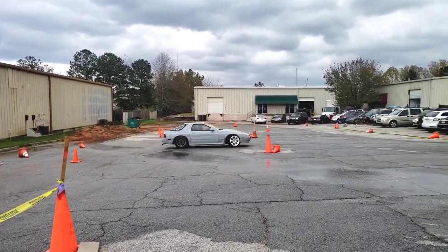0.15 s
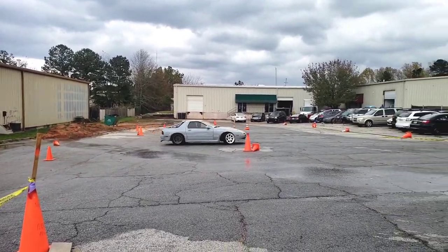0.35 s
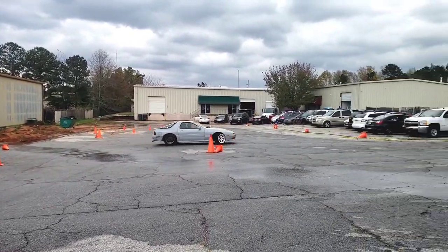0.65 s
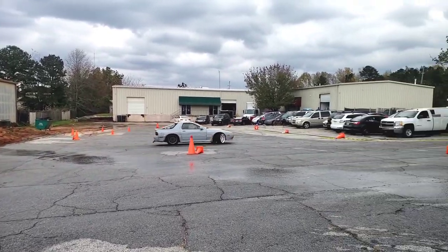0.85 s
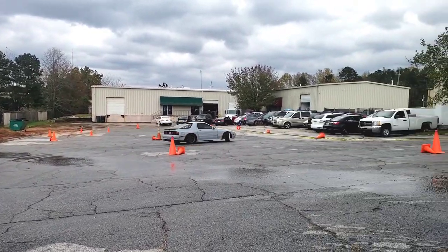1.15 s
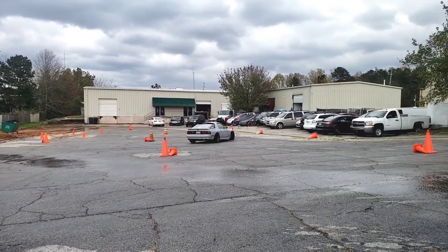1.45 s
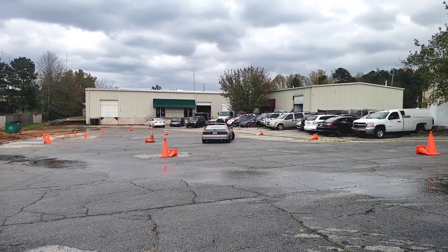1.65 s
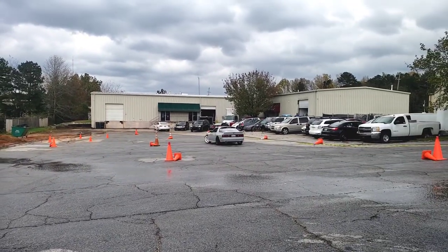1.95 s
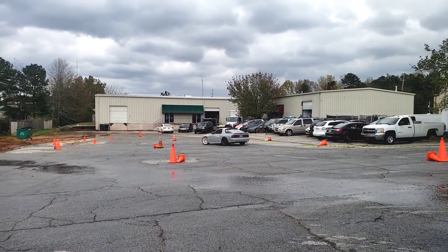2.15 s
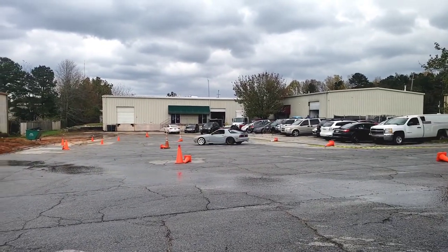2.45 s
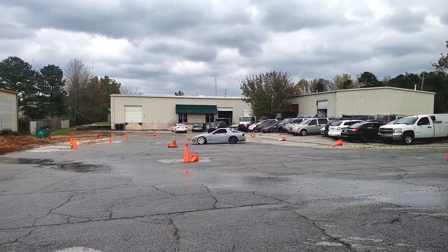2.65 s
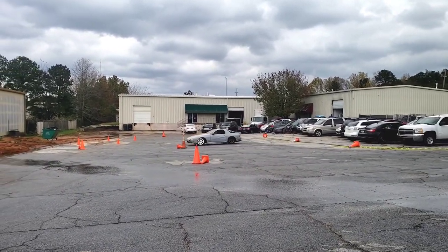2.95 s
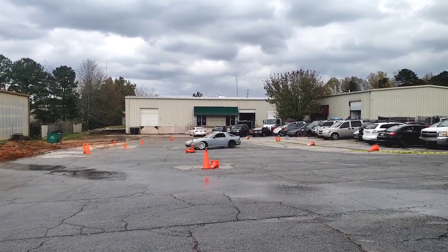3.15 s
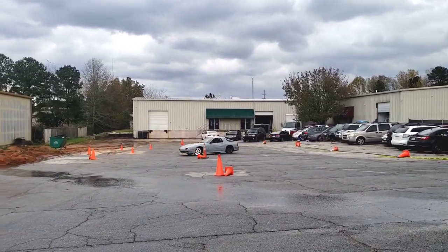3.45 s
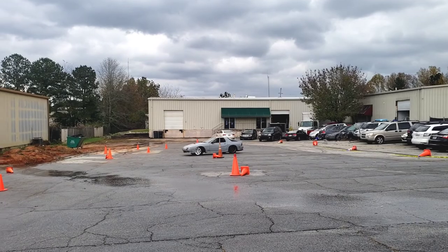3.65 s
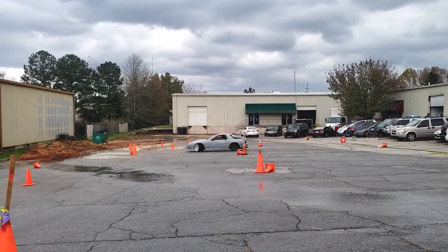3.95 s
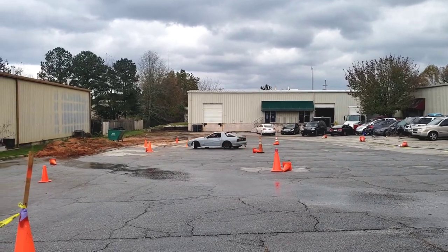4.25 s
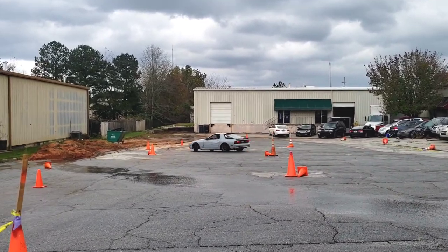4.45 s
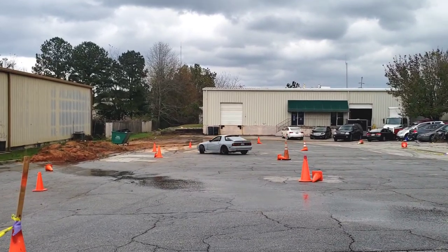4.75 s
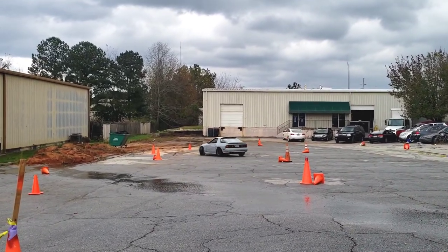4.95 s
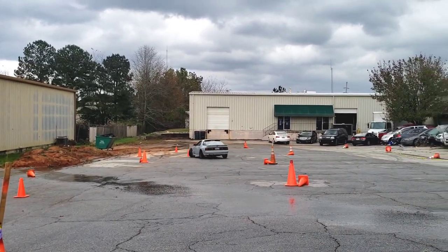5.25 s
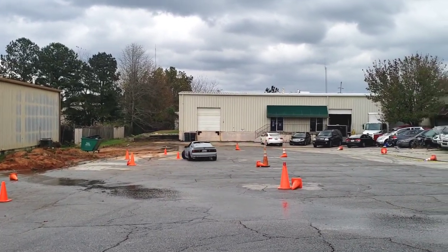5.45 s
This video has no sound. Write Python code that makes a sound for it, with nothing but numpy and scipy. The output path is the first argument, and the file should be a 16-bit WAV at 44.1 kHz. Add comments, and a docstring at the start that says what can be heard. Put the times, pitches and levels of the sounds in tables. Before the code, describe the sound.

A rotary sports car slides around cones on wet asphalt. Its exhaust barks and buzzes through a string of throttle stabs, each climbing in pitch then lifting off, with rasping hiss on the hardest pulls. Soft tyre scrub shows between stabs. Later revs are lower and dull, ending in a deep burbling rise. Open lot, a dull slap of echo from a warehouse, stereo handheld microphone at some distance.

```python
"""Wet parking lot: a rotary-engined car drifts round cones, the throttle stabbed and lifted again and again.
Each firing is a click that drives filters: boom in the muffler, bark in the tailpipe, rasping hiss under load.
Off throttle the clicks grow uneven in strength and timing, so the engine stumbles and burbles.
Filtered noise makes the tyre scrub and open air; a delayed, dulled copy is the warehouse echo."""
import sys
import numpy as np
from scipy import signal
from scipy.fft import rfft, irfft, next_fast_len
from scipy.io import wavfile
from scipy.ndimage import uniform_filter1d

SR = 44100
rng = np.random.default_rng(int(sys.argv[2]) if len(sys.argv) > 2 else 0)


def int16_out(signal):
    """Quantize to a 16-bit WAV file."""
    q = np.round(np.clip(np.atleast_2d(signal).T, -1, 1) * 32767)
    wavfile.write(sys.argv[1], SR, q.astype(np.int16))


N = 246959
TIME_S = np.arange(N) / SR
PADDED = next_fast_len(N + SR // 2)
BINS_HZ = np.maximum(np.arange(PADDED // 2 + 1) * SR / PADDED, 1)


def from_db(db):
    """Decibels to amplitude gain."""
    return 10 ** (np.asarray(db) / 20)


def rms_one(x):
    """Scale to unit rms."""
    return x / np.sqrt(np.mean(x ** 2) + 1e-20)


def in_time(rows):
    """Interpolate each column of a time table to one value a sample."""
    s, *columns = np.transpose(rows)
    return [np.interp(TIME_S, s, column) for column in columns]


def over_hz(points):
    """Interpolate a frequency table, on a log axis, to every bin."""
    hz, value = np.transpose(points)
    return np.interp(np.log(BINS_HZ), np.log(hz), value)


def filtered(x, response):
    """Apply a frequency response."""
    return irfft(rfft(x, PADDED) * response, PADDED)[..., :N]


def body(x, colour):
    """Minimum-phase filter: it rings only after it is struck."""
    cepstrum = irfft(np.log(from_db(over_hz(colour))), PADDED)
    # fold the cepstrum onto positive time
    cepstrum[1:PADDED // 2] *= 2
    cepstrum[PADDED // 2 + 1:] = 0
    return filtered(x, np.exp(rfft(cepstrum)))


def resonate(x, modes):
    """Parallel resonances, each with a centre, a width and a level."""
    response = sum(
        from_db(db) / (1 + 1j * (BINS_HZ - hz ** 2 / BINS_HZ) / width_hz)
        for hz, width_hz, db in modes)
    return filtered(x, response)


def ahead(x, lead_s):
    """Advance in time: the slow swell of a pulse starts before its sharp front."""
    return filtered(x, np.exp(2j * np.pi * BINS_HZ * lead_s))


def evened(x, size=2200):
    """Unit level over a few firings; single pulses keep their differences."""
    power = np.mean(np.atleast_2d(x) ** 2, axis=0)
    power = uniform_filter1d(uniform_filter1d(power, size), size)
    return x / np.sqrt(np.abs(power) + 1e-12)


def drift(knots_per_s):
    """Slow random curve of unit rms, linear between random knots."""
    knots = rng.standard_normal(4000)
    return rms_one(np.interp(TIME_S * knots_per_s, np.arange(len(knots)), knots))


def swell(at_s, half_width_s):
    """Gaussian bump of height 1."""
    return np.exp(-((TIME_S - at_s) / half_width_s) ** 2)


# likeness of left and right noise: f/Hz, likeness/0-1
STEREO_LIKENESS = [(60, 0.61), (400, 0.99), (1000, 0.73), (3000, 1), (14000, 0.13)]


def diffuse_noise():
    """Stereo noise whose left-right likeness varies with frequency."""
    mid, side = rng.standard_normal((2, N))
    alike = np.clip(over_hz(STEREO_LIKENESS), 0, 1)
    return filtered(mid, np.sqrt(1 + alike)) + filtered(side, np.sqrt(1 - alike)) * [[1], [-1]]


# open-air spectrum: f/Hz, relative level/dB
AIR_COLOUR = [(20, -4), (45, -15), (100, 5), (230, 7.5), (470, -17), (850, -12.5), (2000, -17), (3800, -26),
              (6100, -41), (7400, -27.5), (12400, -46), (15800, -40)]


def open_air(level_db):
    """Steady broadband noise of the open air, strongest in the bass."""
    return from_db(level_db) * rms_one(body(diffuse_noise(), AIR_COLOUR))


# warehouse echo, strong while the tailpipe points at it: t/s, delay/s, level before dulling/dB
WALL_ECHO = [(0, .27, -21), (.7, .26, -18.5), (1.15, 0.25, -9.5), (1.5, .25, -14), (2.8, .27, -27),
             (3.5, .23, -12), (4.1, 0.22, -16), (5.6, 0.22, -16)]


def parking_lot(x, scatter_db, t60_s, onset_s):
    """One dull echo from the warehouse, and a faint scatter from parked cars and trees."""
    delay_s, wall_db = in_time(WALL_ECHO)
    dull = body(x, [(100, 6.5), (800, 4), (1500, -2), (4000, -4), (12000, -29)])  # f/Hz, gain/dB
    delayed = np.array([np.interp(TIME_S - delay_s, TIME_S, side, left=0) for side in dull])
    echo = from_db(wall_db) * delayed
    decay = from_db(-60 * TIME_S / t60_s)
    onset = 1 - np.exp(-(TIME_S / onset_s) ** 2)
    tail = diffuse_noise() * decay * onset
    scatter = filtered(dull.mean(axis=0), rfft(rms_one(tail) / np.sqrt(N), PADDED))
    return echo + from_db(scatter_db) * scatter


# scrub spectrum: f/Hz, relative level/dB
SCRUB_COLOUR = [(260, -39.5), (450, -22), (585, -9), (634, -14.5), (715, -18), (824, -9), (1050, -9.5),
                (1490, -13), (2300, -13), (2570, -21.5), (5000, -35), (6500, -79), (11000, -120)]
# tread resonances: f/Hz, width/Hz, relative level/dB
TREAD_RESONANCES = [(829, 46.6, 0), (1480, 120, -7.5)]
# sliding off throttle: t/s, scrub level/dB
SLIDE_LEVEL = [(0, -35.5), (1.5, -42), (2.8, -43), (3.1, -41.5), (3.4, -45), (4.2, -43.5), (4.7, -53),
               (5.6, -56)]
SCRUB_DUCK_DB = 3  # at full throttle
SQUEAL_S, SQUEAL_HALF_WIDTH_S, SQUEAL_DB = 3.08, .11, -41


def tyres(throttle):
    """Rubber scrubs over wet asphalt, less under load; once the tread resonances almost sing."""
    scrub = rms_one(body(diffuse_noise(), SCRUB_COLOUR)) * from_db(1.1 * drift(40))
    scrub_db = in_time(SLIDE_LEVEL)[0] - SCRUB_DUCK_DB * throttle
    tread = rms_one(resonate(diffuse_noise(), TREAD_RESONANCES))
    squeal = from_db(SQUEAL_DB) * swell(SQUEAL_S, SQUEAL_HALF_WIDTH_S) * tread
    return from_db(scrub_db) * scrub + squeal


def pressed(start_s, held_s, attack_s, release_s):
    """One stab, 0-1: linear rise, hold, exponential release."""
    rise = np.clip((TIME_S - start_s) / attack_s, 0, 1)
    return rise * np.exp(-np.maximum(TIME_S - start_s - held_s, 0) / release_s)


# throttle stabs: start t/s, held/s, attack/s, start rate/firings per s, end rate/firings per s,
# bow of the climb/firings per s, coasting time/s, hardest pull t/s, pull half-width/s,
# levels before layer trims: low boom/dB, upper boom/dB, bark/dB, pulse front/dB, hiss/dB,
# rasp/0-1, stumbling/0-1
THROTTLE_STABS = [ (-0.02, 0.09, .018, 161, 167, 0, .5, 0, .04, -24, -31, -32, -31, -35.5, .5, .35),
                  (0.172, 0.288, .012, 142, 151.8, 8.1, .8, .283, .125, -15, -23.5, -24, -28, -39.5, .45, .015),
                  (0.62, 0.55, .05, 123.2, 162.8, -1, .2, 1.055, .135, -17, -20.6, -22.5, -23.5, -36.7, .1, .02),
                  (1.64, 0.46, .035, 93.4, 141.2, 4.6, .5, 1.74, .38, -11.5, -18, -20.7, -31.5, -39.3, .8, .02),
                  (2.281, 0.279, .006, 108.8, 144.7, 4.1, 1.5, 2.42, .45, -13.3, -20, -21.7, -26.5, -31.7, .95, .025),
                  (3.247, 0.633, .013, 64.8, 108.8, 5.2, .27, 3.81, .135, -16, -17.5, -23.7, -31.2, -48.5, .5, .035),
                  (4.78, 0.22, .09, 52, 69, 2, .3, 4.96, .07, -27, -22.8, -43.5, -49.5, -60, .1, 0),
                  (5.2, 0.42, .11, 66, 99.5, 6.5, .3, 5.5, .24, -16.3, -19.2, -34, -50, -54.9, .1, .1), ]
FLYWHEEL_S = .03  # rounds each change of speed


def engine_speed():
    """Firings per s: a bowed climb in each stab, then coasting to where the next one starts."""
    rate = np.zeros(N)
    for stab, following in zip(THROTTLE_STABS, THROTTLE_STABS[1:] + [None]):
        start_s, held_s, _, low, high, bow, coast_s, *_ = stab
        u = np.clip((TIME_S - start_s) / held_s, 0, 1)
        speed = low + (high - low) * u + 4 * bow * u * (1 - u)
        if following:
            end_s = start_s + held_s
            next_start_s, next_low = following[0], following[3]
            fall = np.expm1(-np.maximum(TIME_S - end_s, 0) / coast_s)
            full_fall = np.expm1(-(next_start_s - end_s) / coast_s)
            speed = speed + (next_low - high) * fall / full_fall
        rate = np.where(TIME_S >= start_s, speed, rate)
    return uniform_filter1d(rate, max(int(FLYWHEEL_S * SR), 1))


STEADY_FIRINGS_PER_S, STUMBLE_PER_OCTAVE = 98, .58  # stumbling grows below this speed
STUMBLE_COASTING = .04  # least stumbling at closed throttle, 0-1


def engine_state(rate, release_s):
    """Throttle, rasp share of the hiss, and stumbling, which grows at low speed; all 0-1."""
    gates = np.array([pressed(start_s, held_s, attack_s, release_s)
                      for start_s, held_s, attack_s, *_ in THROTTLE_STABS])
    throttle = np.minimum(gates.sum(axis=0), 1)
    rasp, stumble = np.array(THROTTLE_STABS)[:, -2:].T @ gates
    octaves_slow = np.maximum(np.log2(STEADY_FIRINGS_PER_S / rate), 0)
    stumble = stumble + STUMBLE_COASTING * (1 - throttle) + STUMBLE_PER_OCTAVE * octaves_slow
    return np.clip([throttle, rasp, stumble], 0, 1)


# throttle response per layer: coasting level at middle speed before layer trims/dB,
# coasting slope/dB per octave, load slope/dB per octave, swell towards the hardest pull/dB,
# extra build-up/s, release/s
LOW_BOOM_RESPONSE = (-26, 5.5, 10, 0, .026, .015)
UPPER_BOOM_RESPONSE = (-34.7, 11, -2.7, 8.5, 0, .064)
BARK_RESPONSE = (-49, 10, 0, 15.6, 0, .033)
FRONT_RESPONSE = (-59.5, 8.4, 2.7, 17.3, .013, .035)
HISS_RESPONSE = (-55, 3.4, 4.8, 14.5, .045, .03)
MIDDLE_FIRINGS_PER_S = 100


def layer_gains(rate):
    """Exhaust layer gains: follow engine speed, jump with a stab, swell towards the hardest pull."""
    responses = (LOW_BOOM_RESPONSE, UPPER_BOOM_RESPONSE, BARK_RESPONSE, FRONT_RESPONSE, HISS_RESPONSE)
    gains = []
    for k, response in enumerate(responses):
        coast_db, coast_slope, load_slope, swell_db, build_up_s, release_s = response
        power = from_db(coast_db + coast_slope * np.log2(rate / MIDDLE_FIRINGS_PER_S)) ** 2
        for stab in THROTTLE_STABS:
            start_s, held_s, attack_s, _, top_rate, _, _, pull_s, width_s, *levels_db, _, _ = stab
            slack = 1 - 1 / (1 + ((TIME_S - pull_s) / width_s) ** 2)
            level_db = levels_db[k] + load_slope * np.log2(rate / top_rate) - swell_db * slack
            gate = pressed(start_s, held_s, attack_s + build_up_s, release_s)
            power = power + (gate * from_db(level_db)) ** 2
        gains.append(np.sqrt(power))
    return gains


# brief dips of the deep note: t/s, depth/dB
DEEP_NOTE_DIPS = [(0.52, 15), (0.86, 9), (1.135, 8), (2.17, 11), (2.68, 9), (3.39, 11), (3.56, 6),
                  (3.74, 13), (3.94, 10)]
DIP_HALF_WIDTH_S = .022
WAVER_DB, WAVERS_PER_S = 1.1, 22
MUFFLER_RESONANCE_FIRINGS_PER_S, ABOVE_RESONANCE_DB_PER_OCTAVE = 138, -24


def deep_note_gain(rate):
    """The deep note wavers, dips briefly and fades as revs climb past the muffler's resonance."""
    dips_db = sum(depth_db * swell(s, DIP_HALF_WIDTH_S) for s, depth_db in DEEP_NOTE_DIPS)
    octaves_past = np.maximum(np.log2(rate / MUFFLER_RESONANCE_FIRINGS_PER_S), 0)
    past_resonance_db = ABOVE_RESONANCE_DB_PER_OCTAVE * octaves_past
    return from_db(past_resonance_db + WAVER_DB * drift(WAVERS_PER_S) - dips_db)


# brief swells of treble hiss: t/s, level before hiss trims/dB, half-width/s
HISS_SWELLS = [(1.79, -39, .03), (4.18, -52, .02), (4.4, -59, .15)]


def hiss_swell_gain():
    """Extra hiss gain in short smooth bumps."""
    return sum(from_db(db) * swell(s, half_width_s) for s, db, half_width_s in HISS_SWELLS)


IMBALANCE_HOT, IMBALANCE_COOL = .04, .27  # alternate firings: strength 1 +/- this


def firings(rate, cool, stumble, firm_db, stumble_db, firm_jitter, stumble_jitter, wander):
    """One click a firing from two unequal rotors; stumbling makes strength and timing uneven."""
    imbalance = IMBALANCE_HOT + (IMBALANCE_COOL - IMBALANCE_HOT) * cool
    turns = np.cumsum(rate * (1 + wander * drift(35))) / SR
    number = np.arange(1, int(turns[-1]))
    place = np.interp(number, turns, np.arange(N))
    at = place.astype(int)
    chance = rng.standard_normal((len(at), 2))
    strength = from_db((firm_db + stumble_db * stumble[at]) * chance[:, 0])
    strength = strength * (1 + imbalance[at] * (-1) ** number)
    jitter = (firm_jitter + stumble_jitter * stumble[at]) * chance[:, 1]  # in firing periods
    place = np.clip(place + jitter * SR / rate[at], 0, N - 2)
    # split each click between two samples
    at, late = place.astype(int), place % 1
    clicks = np.zeros(N)
    clicks[at] += strength * (1 - late)
    clicks[at + 1] += strength * late
    return clicks


def puffs(clicks, decay_s, spread_db):
    """Turbulent gas: noise gated by each pulse, dying exponentially."""
    uneven = clicks * from_db(spread_db * drift(130))
    gate = signal.lfilter([1], [1, -np.exp(-1 / (decay_s * SR))], uneven)
    return gate * diffuse_noise()


def tailpipe(x, pipe_hz, reflection):
    """Each pulse runs up and down the last length of pipe and comes out again, weaker."""
    round_trip = np.exp(-2j * np.pi * BINS_HZ / pipe_hz)
    return filtered(x, 1 / (1 - np.clip(reflection, 0, .8) * round_trip))


# gas jet spectrum: f/Hz, relative level/dB
JET_COLOUR = [(1650, -38), (2800, 4.5), (3190, 4), (3430, 1.5), (4080, 1), (5820, -7.5), (7330, -1),
              (8600, -10), (9660, -5.5), (11500, -6), (12900, -6), (14900, -5.5), (15800, -21)]


def gas_jet(rate):
    """A steady rush of gas, brighter the faster the engine turns."""
    rush = rms_one(body(diffuse_noise(), JET_COLOUR))
    top = filtered(rush, 1 / (1 + (9500 / BINS_HZ) ** 6))
    return rush + top * ((rate / 102) ** 1.2 - 1)


# hiss burst spectrum: f/Hz, relative level/dB
BURST_COLOUR = [(700, 8), (2000, -4), (3500, -5), (4500, -24), (5800, -7), (7400, 2), (8800, -1),
                (10500, 4), (12000, 0), (14500, -1.5)]
# pipe cross modes: f/Hz, width/Hz, relative level/dB
PIPE_CROSS_MODES = [(2480, 350, -10), (3130, 240, 0), (3830, 300, 1)]


def exhaust_hiss(clicks, rate, rasp):
    """As rasp grows, the hiss turns into sharp bursts that set the pipe's cross modes ringing."""
    spit = puffs(clicks, decay_s=.00035, spread_db=2.6)
    bursts = evened(body(tailpipe(spit, pipe_hz=750.5, reflection=.37), BURST_COLOUR))
    knocks = tailpipe(rms_one(clicks) + rms_one(spit), pipe_hz=760, reflection=.4)
    ringing = evened(resonate(knocks, PIPE_CROSS_MODES))
    jet = np.sqrt(1 - rasp ** 2) * from_db(4.0) * gas_jet(rate)
    return jet + rasp * from_db(3.5) * bursts + rasp ** 2 * from_db(5.5) * ringing


# hot tailpipe, cooled tailpipe, pulse front: f/Hz, relative level/dB
HOT_PIPE_COLOUR = [(40, -62), (100, -24), (300, -1), (480, -11), (620, -1.5), (760, 7), (900, -0.5),
                   (1050, -8), (1400, -25), (2500, -40), (6000, -58)]
COOL_PIPE_COLOUR = [(40, -69), (450, -31), (580, -2.5), (700, 6), (800, -3), (950, -23), (2500, -38),
                    (6000, -57)]
FRONT_COLOUR = [(40, -38), (200, -1.5), (450, 4.5), (700, -3.5), (1150, 5), (1700, -1), (2100, -5),
                (2500, 0), (3000, -19), (4000, -8.5), (6000, -38.5), (12000, -49)]


def tailpipe_bark(clicks, gas, stumble, cool, bark_gain, front_gain):
    """Pulses bark in the tailpipe and steepen into a brassy buzz; stumbling makes them hoarse."""
    pulses = rms_one(clicks) + (.25 + 2.0 * stumble) * rms_one(gas)
    hot_bark = ahead(body(tailpipe(pulses, pipe_hz=790, reflection=.2), HOT_PIPE_COLOUR), lead_s=.0002)
    cool_bark = body(pulses, COOL_PIPE_COLOUR)
    bark = (1 - cool) * evened(hot_bark) + cool * evened(cool_bark)
    # turbulence tears at the steep front, more at higher partials
    eddies = filtered(diffuse_noise(), 1 / np.sqrt(1 + (1400 / BINS_HZ) ** 4))
    torn = pulses + .65 * rms_one(eddies)
    return bark_gain * bark + front_gain * evened(body(torn, FRONT_COLOUR))


# muffler: f/Hz, relative level/dB
MUFFLER_COLOUR = [(30, -31), (60, 3.5), (90, 4.5), (130, 8), (165, 0.5), (215, -3.5), (270, -1.5),
                  (315, -5.5), (370, -20), (480, -31), (650, -32), (1500, -55.5)]


def muffler_boom(clicks, gas, stumble, low_gain, upper_gain, split_hz):
    """The deep note; its upper part swells as the car's tail swings round, stumbling adds a burble."""
    note = ahead(body(clicks, MUFFLER_COLOUR), lead_s=.0012)
    burble = (.03 + .5 * stumble) * evened(body(gas, MUFFLER_COLOUR))
    boom = evened(note) + burble
    low = filtered(boom, 1 / (1 + (BINS_HZ / split_hz) ** 10))
    return from_db(-3.0) * (low_gain * evened(low) + upper_gain * evened(boom - low))


COOLS_FROM_S, COOLS_OVER_S = 4.2, .6  # exhaust gas cools at idle, which lowers the bark


def rotary_car(rate, rasp, stumble):
    """The firing clicks drive the boom, bark and hiss of the exhaust."""
    low_gain, upper_gain, bark_gain, front_gain, hiss_gain = layer_gains(rate)
    low_gain = low_gain * deep_note_gain(rate)
    hiss_gain = hiss_gain + hiss_swell_gain()
    cool = np.clip((TIME_S - COOLS_FROM_S) / COOLS_OVER_S, 0, 1)
    clicks = firings(rate, cool, stumble, firm_db=.4, stumble_db=4.5,
                     firm_jitter=.001, stumble_jitter=.05, wander=.0015)
    gas = puffs(clicks, decay_s=.003, spread_db=2.0)
    boom = muffler_boom(clicks, gas, stumble, low_gain, upper_gain, split_hz=164.4)
    bark = tailpipe_bark(clicks, gas, stumble, cool, bark_gain, front_gain)
    return boom + bark + hiss_gain * exhaust_hiss(clicks, rate, rasp)


def scene():
    """The car, its tyres, its echoes and the open air."""
    rate = engine_speed()
    throttle, rasp, stumble = engine_state(rate, release_s=.06)
    car = rotary_car(rate, rasp, stumble)
    echoes = parking_lot(car, scatter_db=-15, t60_s=.6, onset_s=.025)
    return open_air(level_db=-38) + echoes + tyres(throttle) + car


# microphone ports: f/Hz, left minus right/dB
PORT_BALANCE_DB = [(60, -3.5), (110, 0), (200, 0), (380, 2.5), (700, 1), (1290, 4.5), (2380, -2.5),
                   (4400, 5.5), (8120, 6), (15000, -5)]
# microphone ports: f/Hz, left lead/rad
PORT_LEAD_RAD = [(60, 0), (1000, -0.61), (2200, -1.24), (4000, -1.45), (8000, -1.54), (14000, -1.5)]
CUTOFF_HZ = 15750


def record(dry):
    """Two microphone ports differ in level and phase over frequency; a steep low-pass cuts the top."""
    half = np.array([[1], [-1]]) / 2
    ports = from_db(half * over_hz(PORT_BALANCE_DB)) * np.exp(1j * half * over_hz(PORT_LEAD_RAD))
    return filtered(dry, ports / np.sqrt(1 + (BINS_HZ / CUTOFF_HZ) ** 200))


dry = scene()
out = record(dry)
int16_out(out)
```